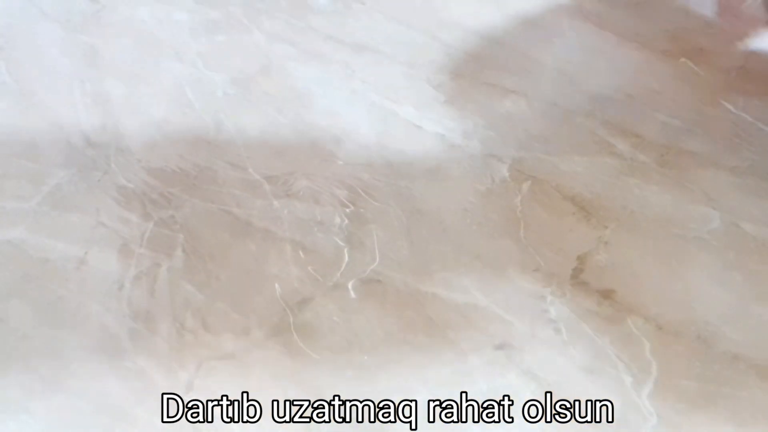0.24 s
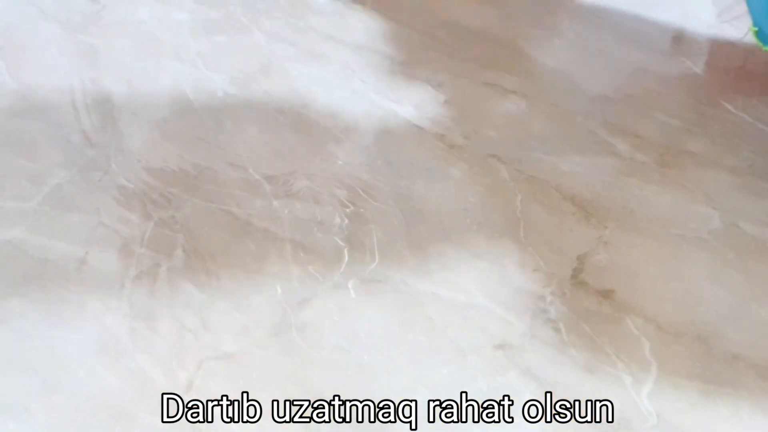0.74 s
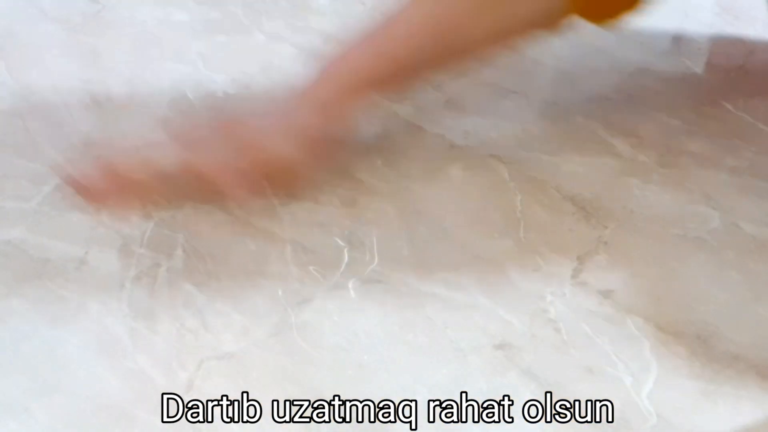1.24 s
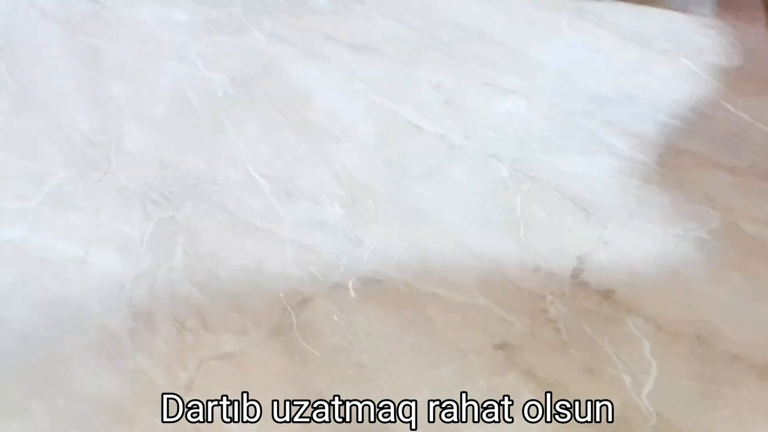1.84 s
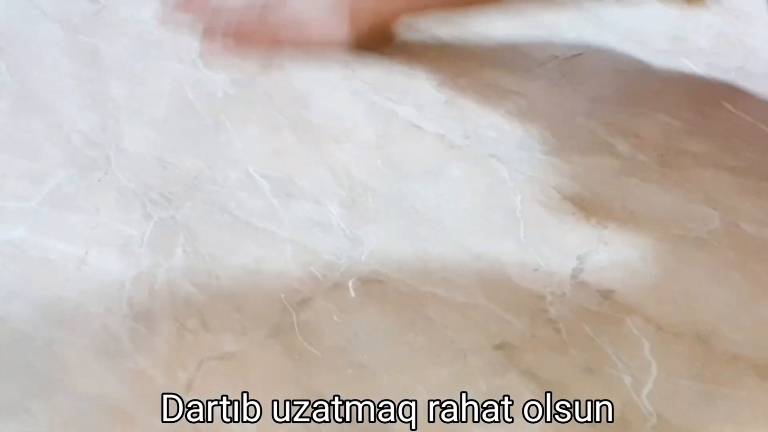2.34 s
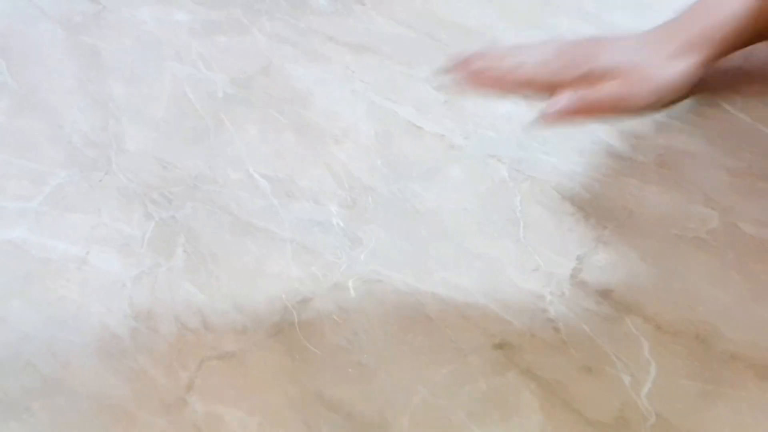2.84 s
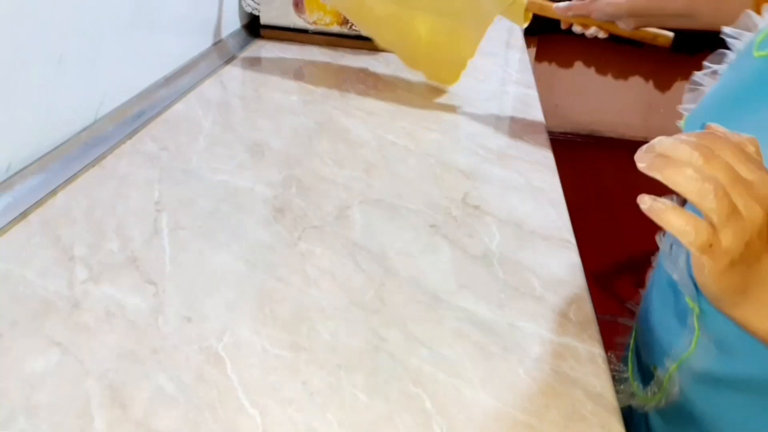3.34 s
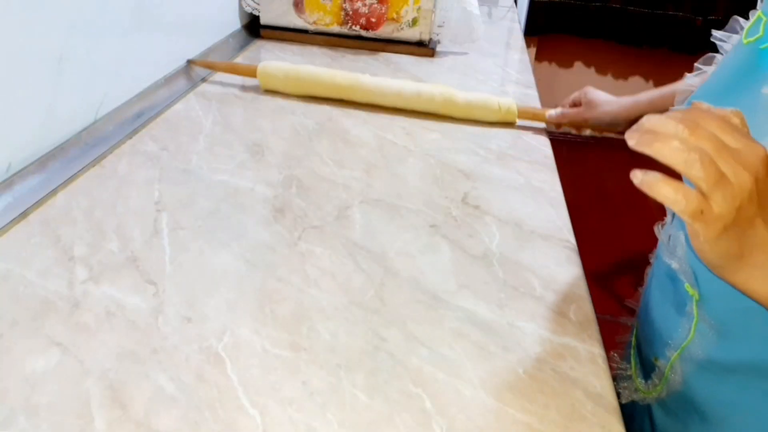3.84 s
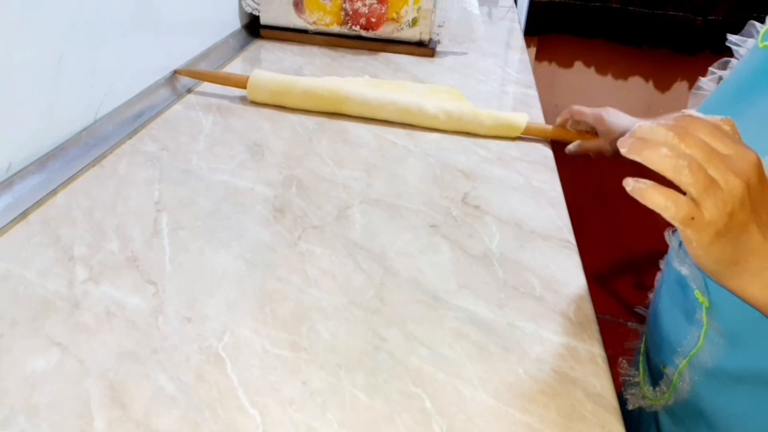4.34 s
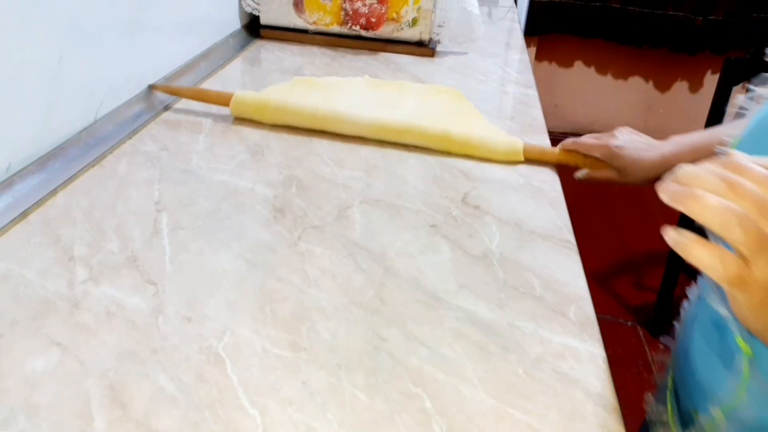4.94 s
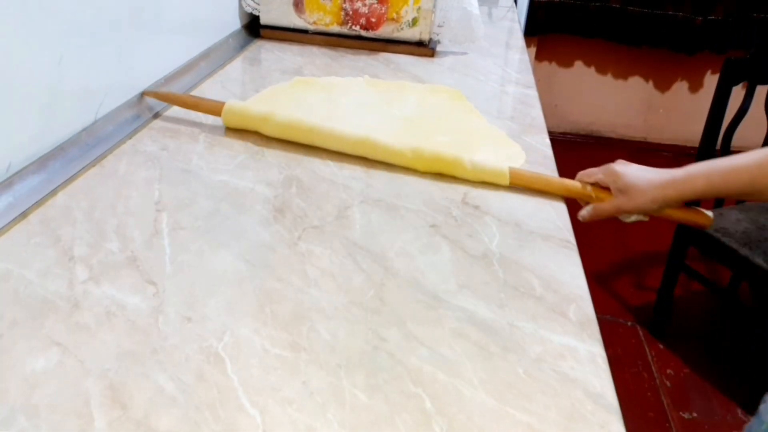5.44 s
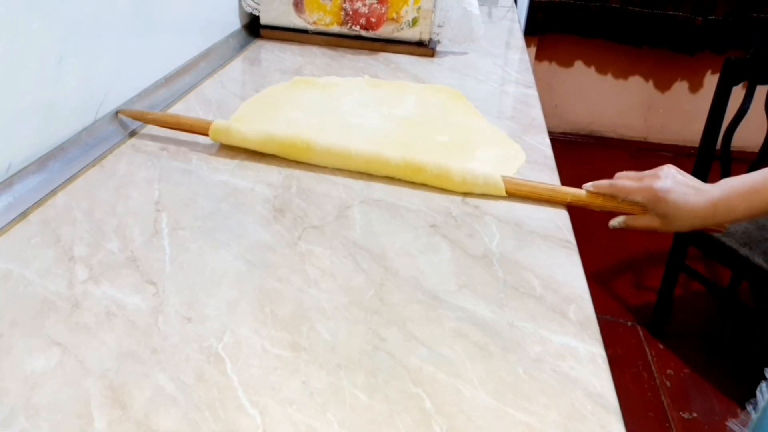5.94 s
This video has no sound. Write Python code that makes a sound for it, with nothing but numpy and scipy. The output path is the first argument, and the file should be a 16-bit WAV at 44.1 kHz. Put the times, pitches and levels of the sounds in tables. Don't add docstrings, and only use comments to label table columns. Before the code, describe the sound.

A small home kitchen, heard close to a stone counter, with a quiet, hoarse low appliance hum leaning right and soft bass stirring from weight shifting on the floor. From 0.2 to 3.3 seconds a palm slides over polished stone in bright, breathy hissing strokes, some slow and trailing, strongest near 0.5, 2.0 and 2.3, with dull palm presses at 1.7 and 1.9. At 3.3 the scene cuts abruptly; a faint whine lasts briefly. A dough-wrapped pin lands softly at 3.75, then at 3.97 its bare wooden end strikes sharply, the loudest sound, rattling in rapid rebounds until 4.05 with a short room echo and low cupboard ring. Faint dough and sleeve rustles continue. A heavy muffled thump comes at 5.15, a hollow, woody double knock at 5.6, then small taps and a dull roll fade by 6 seconds.

```python
import sys
import numpy as np
from scipy import signal
from scipy.fft import rfft, irfft, next_fast_len
from scipy.io import wavfile
from scipy.ndimage import uniform_filter1d, map_coordinates

SR = 44100
rng = np.random.default_rng(int(sys.argv[2]) if len(sys.argv) > 2 else 0)


def digitize_waveform(pressure):
    field = np.atleast_2d(pressure).T
    bounded = np.clip(field, -1, 1)
    quanta = np.round(bounded * 32767).astype(np.int16)
    wavfile.write(sys.argv[1], SR, quanta)


def decibels_to_gain(level_db):
    exponent = np.asarray(level_db, float) / 20
    return 10 ** exponent


N = 273420

# centre in Hz, width in Hz, level in dB.
COUNTER_MODES = [(45.5, 18, -10), (107, 19.6, 0.5), (161, 29.5, 1), (198, 27, 1), (277, 53, 0),
                 (330, 28, 0.5), (479, 50, -9.5), (556, 22, 1.5), (610, 155, -7), (822, 29, -3.5),
                 (1085, 430, -16), (1496, 103, -8.5), (1577, 190, -11), (2320, 500, -35), (2850, 680, -32)]


def unit(x):
    return x / np.sqrt(np.mean(x ** 2) + 1e-20)


def along(points, hz):
    f, v = np.transpose(points)
    return np.interp(np.log(hz + 1), np.log(f + 1), v)


def curves(rows):
    s, *cols = np.transpose(rows)
    return [np.interp(np.arange(N) / SR, s, c) for c in cols]


def wobble(rate):
    knots = rng.standard_normal(int(N * rate / SR) + 4)
    return map_coordinates(knots, [np.arange(N) * rate / SR])


def filtered(x, response):
    m = next_fast_len(x.shape[-1] + SR // 4)
    spectrum = rfft(x, m) * response(np.fft.rfftfreq(m, 1 / SR))
    return irfft(spectrum, m)[..., :x.shape[-1]]


def modes(rows):
    def response(f):
        total = 0
        for k, (centre, width, db) in enumerate(rows):
            damping = 1j * f * width
            total = total + (-1) ** k * decibels_to_gain(db) * damping / (centre * centre - f * f + damping)
        return total
    return response


def leaning(points):
    return lambda hz: decibels_to_gain(along(points, hz) * np.array([[.5], [-.5]]))


def spread(pair):
    # frequency in Hz, left-right likeness from 0 to 1.
    likeness = [(60, 0.95), (150, 0.93), (300, 0.85), (600, 0.48), (1100, 0.12), (4000, 0.03)]

    def shares(hz):
        angle = np.arccos(np.clip(along(likeness, hz), -1, 1)) / 2
        return np.array([np.cos(angle), np.sin(angle)])
    mid, side = filtered(pair, shares)
    return np.array([mid + side, mid - side])


def rush(response, patchy_db):
    z = signal.stft(rng.standard_normal((2, N)), nperseg=512)[2]
    field = uniform_filter1d(rng.standard_normal(z.shape[1:]), size=8, axis=0)
    field = uniform_filter1d(field, size=10, axis=1)
    pair = signal.istft(z * decibels_to_gain(patchy_db * unit(field)), nperseg=512)[1][:, :N]
    return unit(spread(filtered(pair, response)))


def steadied(x, span_s, share):
    power = np.mean(x ** 2, axis=0)
    slow = np.abs(uniform_filter1d(power, size=max(round(span_s * SR), 1))) + 1e-3 * np.mean(x ** 2)
    return unit(x / slow ** (share / 2))


def swells(start, hold, db, rise, fall):
    t = np.arange(0, N + 64, 64)[:, None] / SR
    away = np.clip(start - t, 0, None) / rise + np.clip(t - start - hold, 0, None) / fall
    gain = decibels_to_gain(db - 20 * away ** 1.29)
    return np.interp(np.arange(N) / SR, t[:, 0], np.sqrt(np.sum(gain ** 2, axis=1)))


def first_shot():
    change_s = [3.306, 3.314]
    return np.interp(np.arange(N) / SR, change_s, [1, 0])


def rest():
    return decibels_to_gain(-84.5)


def palm():
    # full speed at seconds, hold in s, hiss in dB, rise in s, fall in s.
    sweeps = [
        (0.215, 0.15, -55.5, 0.048, 0.18),
        (0.443, .1, -44, 0.29, .11),
        (0.672, 0.077, -44, 0.1, 0.36),
        (1.187, 0.021, -52, 0.21, 0.26),
        (1.785, 0.07, -65, 0.17, .15),
        (1.985, 0.18, -46, .1, 0.13),
        (2.293, 0.088, -43, 0.18, 0.16),
        (2.774, .15, -50.5, 0.13, 0.22),
        (3.036, 0.087, -49, 0.33, 0.27),
        (3.303, .03, -45, 0.11, .1),
    ]
    start, hold, db, rise, fall = np.transpose(sweeps)
    return swells(start, hold, db, rise, fall) + rest()


def slab_hum(drone_db):
    # centre in Hz, width in Hz, level in dB.
    bass = [(115.5, 23, 2.5)]
    hum = rush(lambda hz: modes(bass)(hz) ** 2, patchy_db=1.1)
    shaken = decibels_to_gain(-70) * first_shot() * (palm() / decibels_to_gain(-46.5)) ** 0.63
    return (decibels_to_gain(drone_db - 10) + shaken) * steadied(hum, span_s=0.11, share=0.68)


def floor_boom():
    # peak at seconds, level in dB, rise in s, fall in s.
    shifts = [(0.7, -67, 0.59, .4), (1.27, -68, 0.42, 0.47), (1.76, -59, 0.13, 0.18), (2.0, -65, .15, 0.23),
              (3.55, -69.5, 0.76, 0.22), (3.85, -55, 0.24, 0.26), (4.4, -60.5, 0.28, 0.49),
              (5.18, -62, .15, 0.37), (6.15, -66, 0.24, .2)]
    # centre in Hz, width in Hz, level in dB.
    room_mode = [(67.3, 20, 0)]
    peak, db, rise, fall = np.transpose(shifts)
    level = decibels_to_gain(-76.5) + swells(peak, 0, db, rise, fall)
    boom = rush(lambda hz: modes(room_mode)(hz) ** 2, patchy_db=1)
    return 0.68 * level * decibels_to_gain(3.5 + 2.2 * wobble(14)) * steadied(boom, span_s=0.16, share=0.45)


def drone():
    # time in seconds, drone in dB.
    drone_level = [(0.0, -59.5), (0.41, -53), (1.64, -56.5), (2.17, -53.5), (2.64, -57), (3.12, -53),
                   (3.7, -55.5), (3.97, -60), (4.35, -58.5), (4.85, -57), (5.15, -56), (5.54, -59.5),
                   (5.75, -52.5), (6.2, -58.5)]
    # centre in Hz, width in Hz, level in dB.
    hollows = [(203, 27, -15.5), (290.5, 25, -1.5), (326.6, 21.2, 2), (383.2, 18.5, -3), (450, 11.5, -5),
               (495.6, 17.2, -5), (586, 52.5, -12.5), (695, 84, -26), (1094.5, 18, -22), (1676, 150, -28.5)]
    # frequency in Hz, rms level in dB.
    line_tones = [(199.2, -70)]
    # frequency in Hz, density in dB per Hz.
    murk_tone = [(18, -44), (30, -15), (75, -11.5), (237, -7), (315, -1.5), (1290, -22.5), (1720, -22),
                 (2130, -26), (4660, -39.5), (8280, -33.5), (15500, -48)]
    # in, full, fading and out, in seconds.
    whine_s = [3.32, 3.34, 3.50, 3.56]
    # centre in Hz, width in Hz, level in dB.
    whine_modes = [(810, 180, -5.5), (1140, 30, 0)]
    # frequency in Hz, left minus right in dB.
    aside = [(60, -6), (200, -1), (380, 1.5), (700, -5), (1300, -8), (2400, -2)]
    drone_db, = curves(drone_level)
    t = np.arange(N) / SR
    hum = decibels_to_gain(drone_db + 2.0 + 0.32 * wobble(5.8)) * rush(modes(hollows), patchy_db=0.5)
    line = np.zeros(N)
    for hz, db in line_tones:
        level = decibels_to_gain(db + 2.5 + 1.0 * wobble(5.7))
        line += level * np.sin(2 * np.pi * hz * t + 0.35 * wobble(3.83))
    line *= 1 - first_shot()
    murk = decibels_to_gain(-61.0) * rush(lambda hz: decibels_to_gain(along(murk_tone, hz)), patchy_db=3.0)
    whine = rush(lambda hz: modes(whine_modes)(hz) ** 2, patchy_db=-3.5)
    whine = decibels_to_gain(-67.5) * np.interp(t, whine_s, [0, 1, 1, 0]) * whine
    return filtered(hum + line + slab_hum(drone_db) + floor_boom() + murk + whine, leaning(aside))


def strokes():
    # peak at seconds, hiss in dB, rise in s, fall in s, low edge over hiss in dB.
    rustles = [(3.42, -75, 0.045, 0.068, -2), (3.61, -75.5, 0.034, 0.23, 14), (3.81, -61.5, 0.1, 0.16, -1),
               (4.09, -64, 0.13, 0.14, 0), (4.45, -74.5, .08, 0.34, -22), (4.63, -77.5, 0.076, 0.16, 1),
               (4.78, -72, 0.2, 0.1, -14), (5.0, -67.5, 0.16, 0.32, -10), (5.19, -59.5, 0.19, .18, -6),
               (5.42, -67, 0.17, 0.16, -16), (5.67, -61.5, 0.17, 0.27, -3.5), (5.88, -66, .2, 0.25, -4.5),
               (6.11, -70, 0.11, 0.29, -8)]
    # frequency in Hz, density in dB per Hz.
    skin = [(1470, -20.5), (2500, -4.5), (2680, -3.5), (3790, -2.5), (5710, -1.5), (7710, 0), (9870, -5.5),
            (12000, -2.5), (14900, -4), (15600, -7)]
    # frequency in Hz, density in dB per Hz.
    palm_edge = [(700, 22.5), (1200, 8), (2000, 17.5), (3000, -14), (4200, -55), (6000, -33)]
    # frequency in Hz, density in dB per Hz.
    fold_edge = [(1200, -30), (1900, -3), (2300, -2), (3600, -10), (4600, -18), (6500, -34)]
    peak, db, rise, fall, rim_db = np.transpose(rustles)
    first = first_shot()
    later = 1 - first
    hiss = first * palm() + later * (swells(peak, 0, db + 4.0, rise, fall) + rest())
    upper = hiss * rush(lambda hz: decibels_to_gain(along(skin, hz)), patchy_db=1.57)
    palm_level = first * decibels_to_gain(-64) * (palm() / decibels_to_gain(-47.5)) ** 0.47
    palm_rim = palm_level * rush(lambda hz: decibels_to_gain(along(palm_edge, hz)), patchy_db=0.0)
    dough_level = later * swells(peak, 0, db + rim_db, rise, fall)
    dough_rim = dough_level * rush(lambda hz: decibels_to_gain(along(fold_edge, hz)), patchy_db=-1.5)
    unevenness = decibels_to_gain(0.76 * wobble(13) + 0.43 * wobble(120))
    return unevenness * (upper + palm_rim + dough_rim)


def presses():
    # touch at seconds, length in s, thud in dB, slab note in dB, grit in dB.
    landings = [
        (1.701, 0.063, -43, -46.5, -62),
        (1.932, 0.064, -48, -41.5, -86),
        (3.744, 0.12, -40.5, -39.5, -51.5),
        (5.072, 0.044, -49, -56, -71),
        (5.145, 0.083, -36.5, -39.5, -48),
        (5.69, 0.022, -46, -47, -61),
        (5.805, 0.077, -43.5, -44.5, -63),
        (5.909, .05, -49, -54, -73),
    ]
    # centre in Hz, width in Hz, level in dB.
    thud_modes = [(168, 50, -4.5), (239, 49, -2), (294, 66, 0.5), (352, 38, -2.5), (457, 88, -13)]
    touch, length, thud_db, slab_db, grit_db = np.transpose(landings)

    def contact(db, fall_s):
        return swells(touch, 0.56 * length, db, 0.014, fall_s)

    def thud_tone(hz):
        return modes(thud_modes)(hz) / (1 + (hz / 600) ** 2) * hz / (hz + 150)

    def grit_tone(hz):
        return modes(COUNTER_MODES[6:])(hz) * hz / (hz + 400) / (1 + (hz / 1300) ** 2)

    pushes = (rng.random((2, N)) < 2500 / SR) * rng.standard_normal((2, N))
    thud = steadied(spread(filtered(pushes, thud_tone)), span_s=0.021, share=0.57)
    slab = unit(np.sin(2 * np.pi * np.cumsum(113 + 3 * wobble(9)) / SR))
    slab_level = swells(touch + 0.47 * length, 0.18 * length, slab_db, 0.56 * length, 0.088)
    grit = rush(grit_tone, patchy_db=2.0)
    return (contact(thud_db, 0.096) * thud + slab_level * slab
            + contact(grit_db, 0.11) * decibels_to_gain(1.3 * wobble(90)) * grit)


def echo():
    # frequency in Hz, time to fall 60 dB in s.
    decay = [(80, 0.3), (300, 0.39), (1000, 0.38), (3000, 0.38), (8000, 0.32), (14000, 0.47)]
    hz, t, z = signal.stft(rng.standard_normal((2, SR // 2)), SR, nperseg=256)
    fading = decibels_to_gain(-60 * t / along(decay, hz)[:, None])
    tail = spread(signal.istft(z * fading, SR, nperseg=256)[1])
    return tail / np.linalg.norm(tail[0])


def knocks():
    # time in seconds, blow in dB, contact in s, pin ring in dB, tick in dB.
    blows = [(3.9700, -15, 0.00012, 6, -24.5), (3.9737, -26, 0.00033, -3, -49),
             (3.9784, -16.5, 0.00015, -2, -42), (3.9910, -24.5, 0.000097, -2, -34),
             (4.008, -23.5, 0.00017, -12, -39), (4.0180, -23, 0.000059, 0, -42),
             (4.0550, -22, 0.00014, -19, -37.5), (5.1426, -35.5, 0.00014, 7, -70),
             (5.594, -25.5, 0.00013, 12, -68), (5.5974, -21.5, 0.00022, 9.5, -70),
             (5.6310, -34, 0.00026, 12, -68), (5.6700, -35, 0.00031, 7, -68)]
    # centre in Hz, width in Hz, level in dB.
    slap = [(400, 520, -7)]
    # centre in Hz, width in Hz, level in dB.
    tick_modes = [(789, 38, 25.5), (850, 65, 22.5), (2440, 1400, -2), (5170, 2300, -3), (7650, 1670, 0),
                  (12900, 2200, -17)]
    # frequency in Hz, echo against direct sound in dB.
    wet = [(80, 0.5), (250, 1.5), (700, 1.5), (1000, 4), (2200, 8), (8000, 0.5), (14000, 6)]
    direct, room = np.zeros(N + SR), np.zeros((2, N + SR))
    t = np.arange(SR // 4) / SR
    for s, blow_db, contact_s, pin_db, tick_db in blows:
        def struck(hz):
            slab, pin = modes(COUNTER_MODES[:10])(hz), modes(COUNTER_MODES[10:])(hz)
            return modes(slap)(hz) + slab + decibels_to_gain(pin_db) * pin
        push = t * t * np.exp(-t / contact_s)
        ring = filtered(-push, struck)
        tick = filtered(rng.standard_normal(len(t)) * decibels_to_gain(-60 * t / 0.013), modes(tick_modes))
        near = decibels_to_gain(blow_db) * ring / np.abs(ring).max() + decibels_to_gain(tick_db) * tick
        far = signal.fftconvolve(near[None], echo(), axes=1)
        at = round(s * SR)
        direct[at:at + len(t)] += near
        wall = at + 200
        room[:, wall:wall + far.shape[1]] += far
    return direct[:N] + filtered(room[:, :N], lambda hz: decibels_to_gain(along(wet, hz)))


def sway():
    # blow at seconds, frequency in Hz, level in dB, time to fall 60 dB in s.
    swings = [
        (3.975, 68.64, -46, 2.4),
        (5.6, 58, -35, 0.72),
        (5.801, 59.2, -40.5, 0.47),
    ]
    total = np.zeros(N)
    for s, hz, db, t60 in swings:
        after = np.clip(np.arange(N) / SR - s, 0, None)
        level = decibels_to_gain(db - 60 * after / t60) * (1 - np.exp(-after / 0.0085))
        total += level * np.sin(2 * np.pi * hz * after + 2.0 * wobble(9.9))
    return total


def scene():
    return drone() + strokes() + presses() + knocks() + sway()


def band_limit(x):
    return signal.sosfilt(signal.butter(12, 15950, fs=SR, output="sos"), x)


def record(dry):
    # frequency in Hz, left minus right in dB.
    mic_lean = [(60, -2), (180, -2.5), (550, -2.0), (1650, -4.5), (4970, -2), (15000, 0.5)]

    def microphones(hz):
        return leaning(mic_lean)(hz) * (hz < 15560) / (1 + (38 / (hz + 1)) ** 4)
    return band_limit(filtered(dry, microphones))


dry = scene()
out = record(dry)
digitize_waveform(out)
```